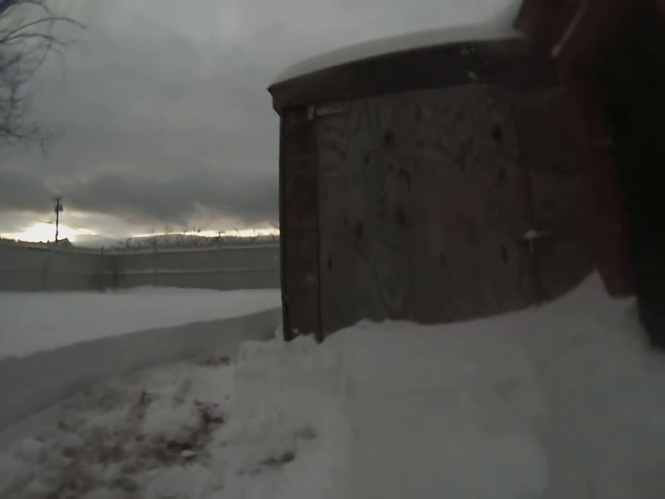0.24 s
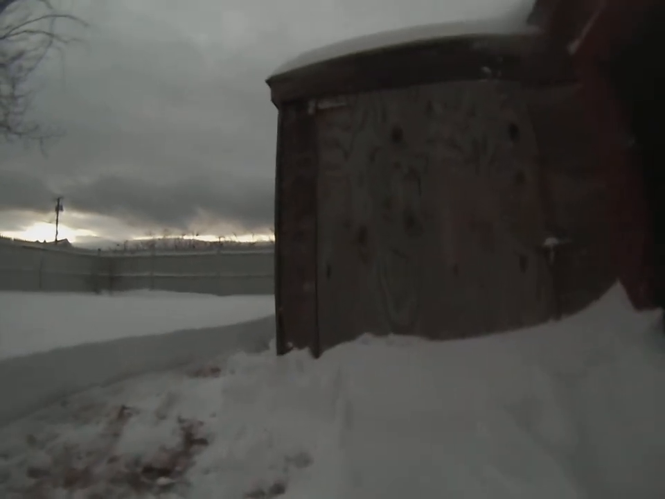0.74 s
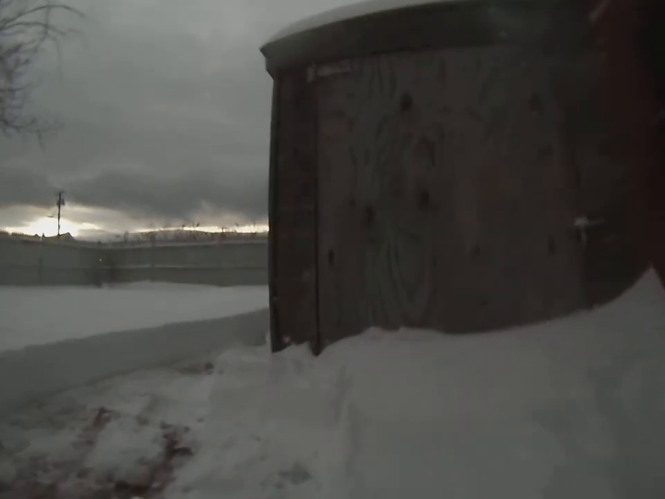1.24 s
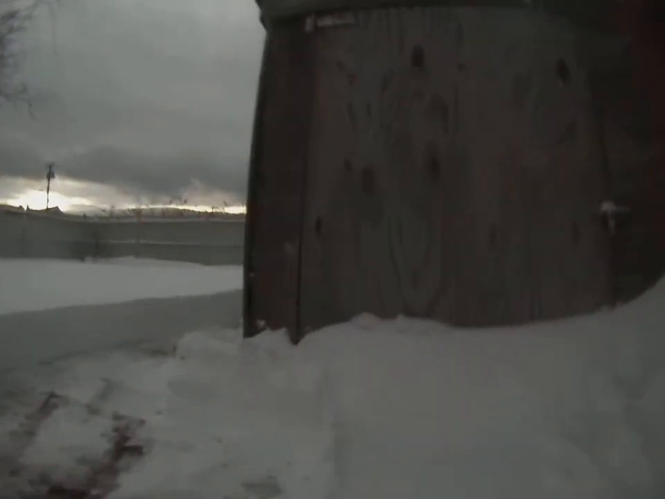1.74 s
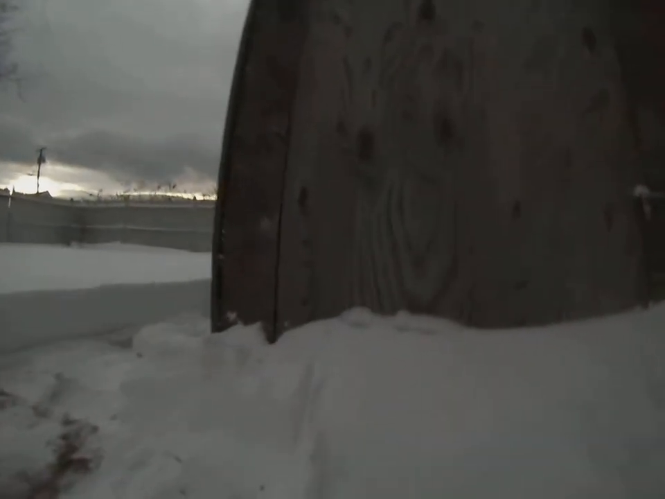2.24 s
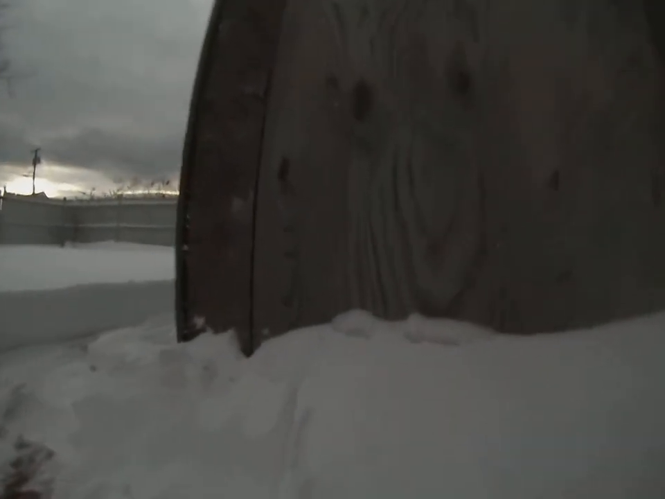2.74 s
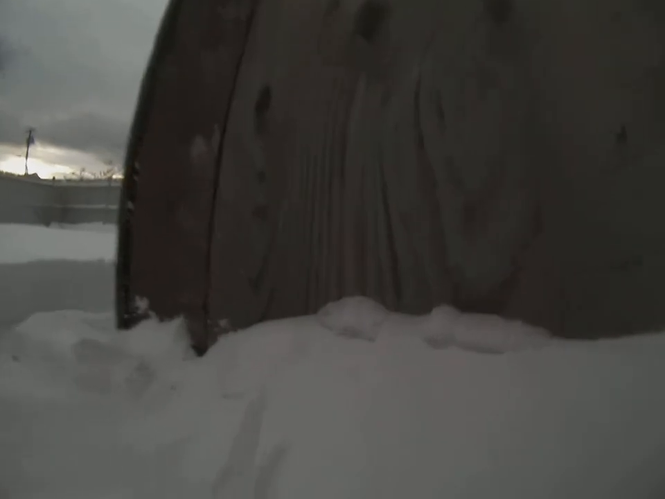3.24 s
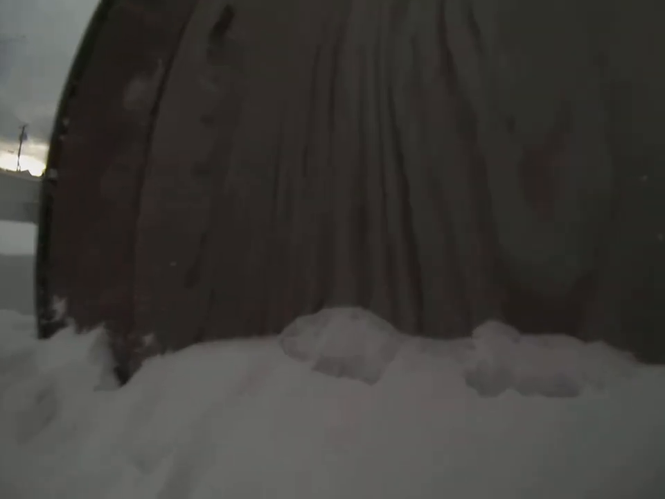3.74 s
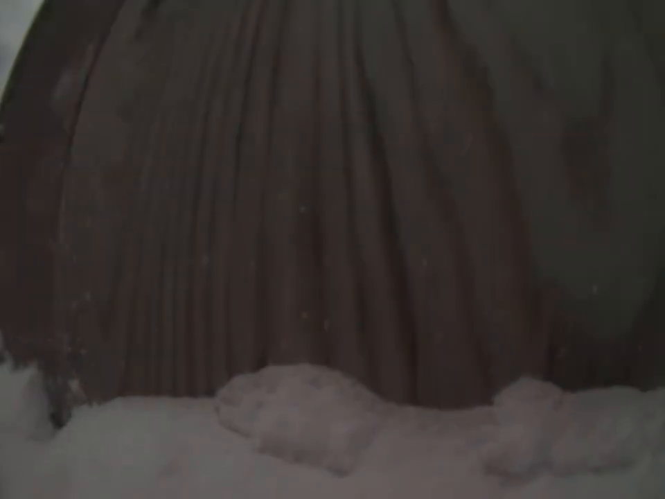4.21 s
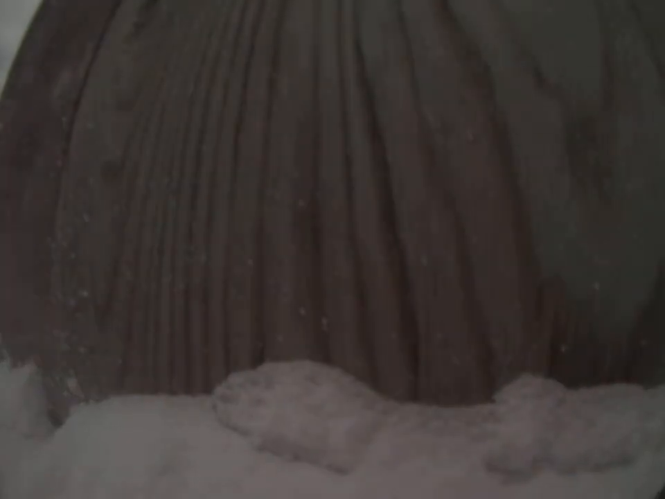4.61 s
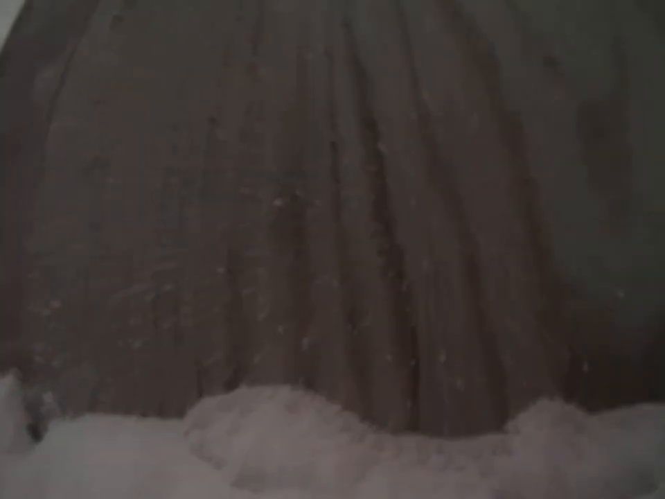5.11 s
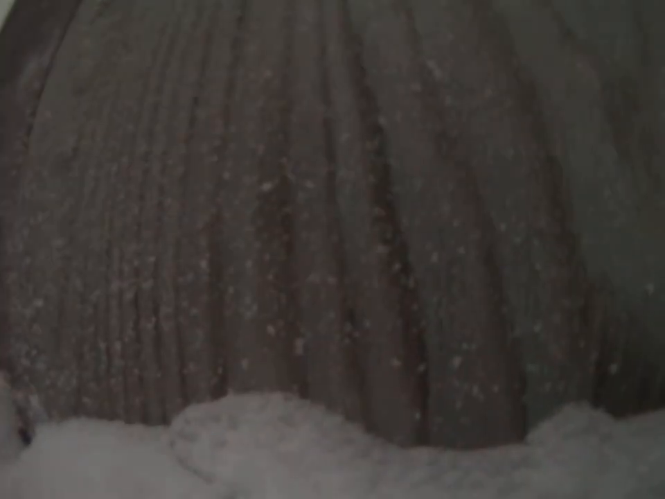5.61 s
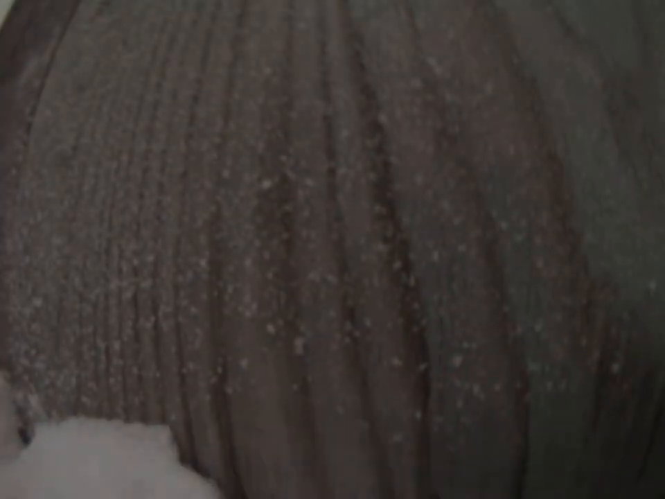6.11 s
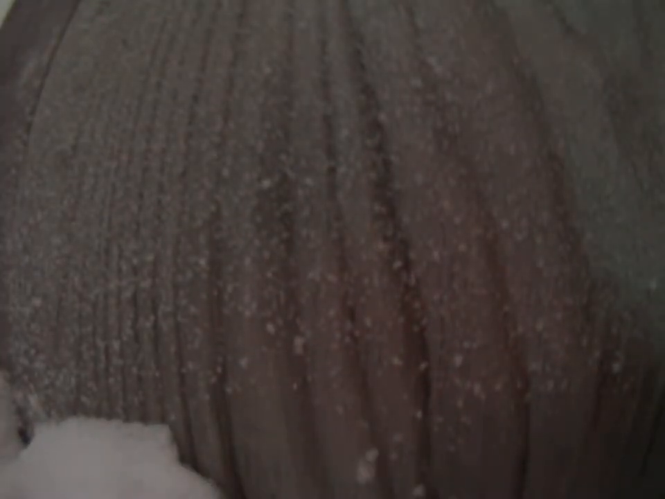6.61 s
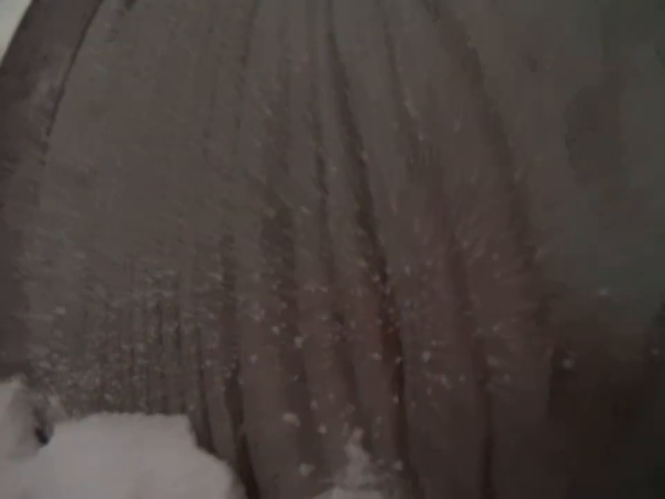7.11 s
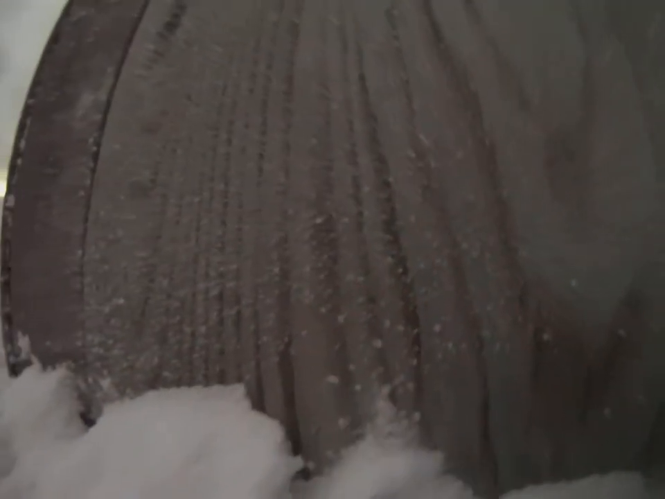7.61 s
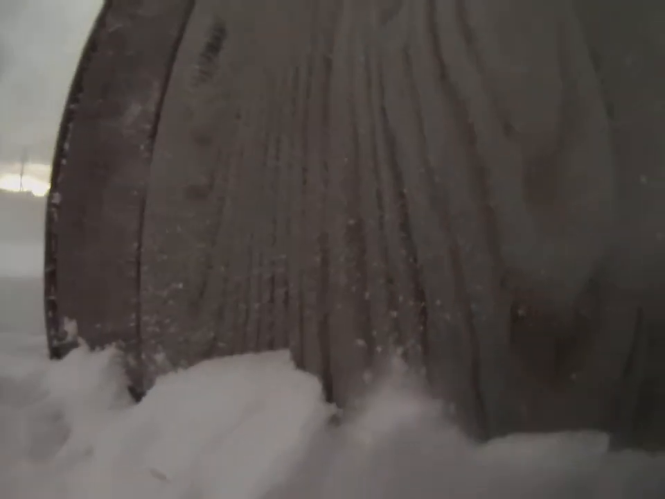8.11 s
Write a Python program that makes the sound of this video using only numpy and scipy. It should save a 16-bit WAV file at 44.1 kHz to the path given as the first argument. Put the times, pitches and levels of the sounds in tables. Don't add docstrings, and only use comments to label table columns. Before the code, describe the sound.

Very close, dry and mono: a one-cylinder engine drones with heavy low vibration, uneven firing and fast clattering panels. Snow and exhaust roar beneath. Cutting deeper, it slows and strains around four seconds, then picks up, eases briefly near five, and runs faster from six with a denser rattle, jolted by hard bites near eight. It never stops.

```python
import sys
import numpy as np
from scipy import signal
from scipy.fft import rfft, irfft, next_fast_len
from scipy.io import wavfile
from scipy.ndimage import uniform_filter1d, map_coordinates

SR = 44100
rng = np.random.default_rng(int(sys.argv[2]) if len(sys.argv) > 2 else 0)


def output_pcm(signal):
    pcm = np.clip(np.atleast_2d(signal).T, -1, 1) * 32767
    wavfile.write(sys.argv[1], SR, np.round(pcm).astype(np.int16))


def volts_from_decibels(level):
    exponent = np.asarray(level, float) / 20
    return 10 ** exponent


N = 368235


def unit(x):
    return x / np.sqrt(np.mean(x ** 2) + 1e-20)


def steady(x, seconds):
    length = int(seconds * SR)
    power = uniform_filter1d(uniform_filter1d(x ** 2, length), length)
    return x / np.sqrt(np.abs(power) + 1e-12)


def curves(rows):
    s, *cols = np.transpose(rows)
    return [np.interp(np.arange(N) / SR, s, c) for c in cols]


def swells(rows):
    t = np.arange(N) / SR
    return sum(db * np.exp(-((t - s) / length) ** 2 / 2) for s, length, db in rows)


def wobble(rate):
    knots = rng.standard_normal(int(N * rate / SR) + 4)
    return map_coordinates(knots, [np.arange(N) * rate / SR])


def per_turn(turns):
    return rng.standard_normal(int(turns[-1]) + 2)[turns.astype(int)]


def filtered(x, response):
    m = 2 * next_fast_len(N // 2 + SR // 4)
    return irfft(rfft(x, m) * response(np.fft.rfftfreq(m, 1 / SR)), m)[:N]


def band(x, lo_hz, hi_hz, order):
    return signal.sosfilt(signal.butter(order, [lo_hz, hi_hz], "band", fs=SR, output="sos"), x)


def modes(table):
    def response(f):
        total = 0
        for k, (centre, width, db) in enumerate(table):
            damping = 1j * f * width
            total = total + (-1) ** k * volts_from_decibels(db) * damping / (centre * centre - f * f + damping)
        return total
    return response


def colour(points):
    hz, db = np.transpose(points)
    return lambda f: volts_from_decibels(np.interp(np.log(f + 1), np.log(hz), db))


def causal(gain):
    def response(f):
        cepstrum = irfft(np.log(gain(f) + 1e-6))
        half = len(cepstrum) // 2
        fold = np.r_[1, np.full(half - 1, 2), 1, np.zeros(half - 1)]
        return np.exp(rfft(cepstrum * fold))
    return response


# (time [s], shaft speed [Hz], shaking at shaft speed [dB])
SHAFT = [(0.0, 65.16, -12.6), (0.76, 63.93, -15.3), (1.25, 63.86, -14.4), (1.41, 63.98, -15.3),
         (2.5, 63.18, -16.5), (2.67, 62.73, -18.6), (3.1, 62.43, -15.8), (3.98, 60.46, -15.9),
         (4.14, 59.32, -16.4), (4.63, 61.55, -16.0), (5.06, 63.31, -13.8), (5.46, 62.64, -13.8),
         (6.16, 66.57, -14.6), (6.45, 66.54, -13.6), (7.09, 67.23, -14.7), (7.25, 66.85, -13.4),
         (7.8, 66.85, -12.6), (8.35, 67.81, -13.1)]
# (time [s], slip of the second order [turns], nearness of the wall [0-1])
PUSH = [
    (0, .02, 0),
    (2.9, -.03, 0),
    (4.6, .19, .35),
    (5.1, 0, .45),
    (5.35, .04, .5),
    (6.3, .41, 1),
    (7.0, .41, .95),
    (7.25, .13, .9),
    (8.35, .1, .65),
]


def level(db, shaking=0, sag=0, slip=0, wall=0):
    hz, shake_db = curves(SHAFT)
    slip_turns, near = curves(PUSH)
    return db + shaking * (shake_db + 15) + sag * (63.5 - hz) + slip * slip_turns + wall * near


# (time [s], length [s], level [dB])
BITES = [
    (.1, 0.11, 2.5),
    (2.15, 0.081, 2),
    (3.5, 0.13, 3),
    (4.4, 0.23, 4),
    (5.15, 0.1, -6),
    (5.5, 0.1, -3),
    (7.25, 0.13, -1.5),
    (7.75, 0.21, 0.5),
    (8.03, 0.088, 5),
    (8.3, 0.064, 4),
]


def shudder():
    return swells(BITES)


# (time [s], length [s], dip [dB])
SLACK = [(0.026, 0.0078, -6.3), (0.461, 0.0062, -8), (0.684, 0.0063, -8.5), (0.732, 0.007, -4.5),
         (0.776, 0.0076, -10), (0.871, 0.007, -2.5), (0.995, 0.007, -13), (1.086, 0.007, -5.5),
         (1.231, 0.007, -8.5), (1.498, 0.0077, -6.5), (1.558, 0.0057, -11), (1.717, 0.0035, -8.8),
         (1.777, 0.0076, -7.5), (1.839, 0.007, -10.5), (2.093, 0.0061, -7.5), (2.283, 0.0059, -2.5),
         (2.496, 0.0056, -7.5), (2.658, 0.004, -8.5), (2.886, 0.0058, -7.5), (3.713, 0.0078, -3.5),
         (3.782, 0.0043, -5.5), (3.837, 0.0054, -8), (3.924, 0.0063, -7.5), (4.063, 0.007, -11.5),
         (4.106, 0.0062, -6.5), (4.95, 0.0078, -8), (5.006, 0.0047, -11), (5.268, 0.007, -3),
         (5.809, 0.007, -3.5), (5.866, 0.0052, -6.5), (6.022, 0.007, -7), (6.049, 0.0043, -2.5),
         (6.408, 0.0058, -5.5), (6.803, 0.0034, -3.5), (6.858, 0.0034, -4), (7.072, 0.0078, -7.5),
         (7.222, 0.0051, -4.5), (8.03, 0.0065, -13.5), (8.09, 0.008, -8.5), (8.159, 0.0065, -4.5)]


def slack():
    return swells(SLACK)


# (frequency [Hz], level per Hz [dB])
ROAR = [(15, 2.5), (60, -4), (300, 0), (430, -5.5), (520, -11.5), (620, -2.5), (780, -10), (900, -7.5),
        (1050, -16.5), (1500, -11.5), (3200, -26), (6000, -38.5), (8000, -66)]


def roar(turns, over):
    puff_db = 1.5 * np.cos(2 * np.pi * (turns - .85)) + 1.6 * per_turn(turns) + .8 * wobble(6)
    puff = volts_from_decibels(puff_db) + 1.8 * over
    noise = filtered(puff * rng.standard_normal(N), colour(ROAR))
    return volts_from_decibels(level(-35.5, shaking=.8, sag=.35, slip=-9.5)) * unit(noise)


# (time [s], peak level [dB])
TICKS = [(0.077, -50), (0.2299, -46.5), (0.2924, -53), (0.822, -54.5), (0.852, -53), (1.3528, -55.5),
         (1.4157, -57), (1.4775, -51), (1.5713, -57), (1.6347, -52.5), (1.7923, -54), (1.8238, -55.5),
         (2.011, -51), (2.0592, -55), (2.391, -53), (2.4877, -61), (2.5177, -56), (2.6439, -53),
         (2.7392, -51), (2.7716, -55.5), (2.8674, -55), (3.5758, -56), (3.8711, -56), (3.904, -51.5),
         (4.0357, -50), (4.1365, -58.5), (5.0974, -51), (5.3966, -52), (5.657, -50), (5.8182, -54),
         (5.966, -51), (5.9968, -52), (6.1225, -54), (6.2422, -53), (6.362, -54), (6.4183, -53.5),
         (6.513, -53.5), (6.6328, -56), (6.6623, -54), (6.7226, -54.5)]
# (frequency [Hz], level per Hz [dB])
TICK = [(5000, -30), (6500, -1), (7200, -5), (9000, -8), (12200, -11), (13300, -21), (15500, -30),
        (16500, -70)]


def tick(chatter, over):
    length_s, over_usual_db = .0014, 62
    topped = volts_from_decibels(swells((s + length_s, length_s, db + over_usual_db) for s, db in TICKS)) - 1
    stray = (.3 * topped + .047 * volts_from_decibels(3 * wobble(9.8))) * rng.standard_normal(N)
    bright = filtered(chatter * (.14 + .67 * over) + stray, colour(TICK))
    return volts_from_decibels(-68.5) * steady(bright, .8)


# (time [s], peak level [dB])
HARD = [(0.9428, -18.5), (1.0041, -17), (1.2401, -16.5), (1.4112, -16.5), (1.5678, -16), (1.7255, -27),
        (1.7878, -22), (2.0547, -7.5), (2.1026, -20), (2.1974, -11), (2.2922, -20.5), (2.5143, -12.5),
        (2.6723, -20), (2.8973, -10.5), (3.4916, -13.5), (3.637, -18), (3.8008, -16), (3.85, -14.5),
        (3.9335, -15), (4.0821, -20.5), (4.1829, -15), (4.2497, -17.5), (4.2822, -12), (4.4164, -16),
        (4.53, -11.5), (4.578, -16.5), (4.594, -10.5), (4.6284, -17), (4.6773, -19), (4.9661, -21),
        (5.442, -15), (5.6461, -20), (5.7239, -13), (5.7862, -20), (5.879, -18), (5.91, -14),
        (5.9713, -15.5), (6.0017, -17), (6.0325, -13), (6.0621, -19.5), (6.124, -14), (6.2424, -12.5),
        (6.4228, -19.5), (6.6927, -16), (6.8129, -24), (6.8723, -22), (7.0818, -12.5), (7.1262, -20.5),
        (7.2454, -12), (7.5158, -14.5), (7.5607, -17.5), (7.8146, -20.5), (7.9189, -16.5), (7.965, -15.5),
        (8.0401, -12), (8.098, -26.5), (8.113, -15), (8.1863, -15.5)]


def hard_strokes():
    lag_s, length_s, share, over_usual_db = .0015, .003, .55, 21
    return volts_from_decibels(swells((s + lag_s, length_s, share * (db + over_usual_db)) for s, db in HARD))


def contacts(turns, shake, over, hard):
    near = curves(PUSH)[1]
    trough_turn = .657 - .09 * near
    crest_db = -4 - 10 * near
    swing = np.abs(uniform_filter1d(shake ** 2, 600)) / np.mean(shake ** 2)
    swing_db = .3 * 10 * np.log10(swing + .05)
    between = volts_from_decibels(-14.5 + .7 * crest_db + 3.4 * wobble(40))
    low = between + 1.9 * over
    high = .75 * between + .45 * over
    lead = np.zeros(N)
    trough = (trough_turn - .01, .024, 3.1, 0, 0)
    crest = (.915, .022, 2.2, crest_db, -5)
    for turn, spread, tail, db, high_db in [trough, crest]:
        cycle = turns - turn + .5
        off = cycle % 1 - .5 - .012 * per_turn(cycle + 1)
        glance_db = -.8 * np.abs(per_turn(cycle + 1)) ** 1.7 * (hard < 1.05)
        size = volts_from_decibels(db + glance_db + 5.5 + swing_db)
        low_width = spread * np.where(off > 0, tail, 1)
        high_width = spread * np.where(off > 0, tail * .65, 1)
        low = low + size * np.exp(-(off / low_width) ** 2 / 2)
        high = high + volts_from_decibels(high_db) * size * np.exp(-(off / high_width) ** 2 / 2)
        onset = np.diff(np.sign(off), prepend=1) > 1
        lead = lead + size * onset * np.sign(per_turn(cycle + 1))
    return low, high, lead


# (time [s], level [dB])
FIRM = [(0, 1), (.3, -1), (.6, -2.2), (3, -3), (3.6, 0), (4.7, -1.8), (5.1, -4.3), (5.5, 0), (6, -2.5),
        (6.9, -3.5), (7.15, -4), (7.4, -0.4), (8.35, -1)]
# (frequency [Hz], level per Hz [dB])
HOUSING = [(900, -37.5), (1080, -26.5), (1250, -13.5), (1500, -1), (1750, -6.5), (2000, -4.5),
           (2300, -14.5), (3100, -15.5), (3600, -21.5), (3800, -16.5), (4050, -21.5), (4500, -27.5),
           (4950, -20.5), (6500, -38.5), (8000, -71.5)]
# (from [Hz], to [Hz], share of the short bright burst [0-1], change at the wall [dB], buzz between contacts [gain])
PANELS = [(690, 1658, 0.054, 1.2, 0.027), (1760, 2442, .1, 2.2, 0.025), (2548, 3720, 0.15, 1.4, 0.092),
          (3680, 4500, 0.62, 2.2, .04), (4554, 5700, 0.79, 1.8, 0.011), (5900, 11000, .95, .1, .02)]


def rattle(turns, shake, over):
    near, firm_db = curves(PUSH)[1], curves(FIRM)[0]
    hard = hard_strokes()
    low, high, lead = contacts(turns, shake, over, hard)
    hits = (rng.random(N) < .09) * np.tanh(3 * rng.standard_normal(N))
    impacts = .4 * rng.standard_normal(N) + 3.2 * hits
    blows = 0
    for lo_hz, hi_hz, bright, wall_db, buzz in PANELS:
        even = steady(band(impacts, lo_hz, hi_hz, order=2), .0025)
        chatter = np.sqrt((hi_hz - lo_hz) / SR * 2) * even
        burst = buzz + low + bright * (high - low)
        strike = burst * chatter + 5.5 * band(lead, lo_hz, hi_hz, order=2)
        blows = blows + hard * volts_from_decibels(bright * firm_db + wall_db * near) * strike
    ring = steady(filtered(blows, causal(colour(HOUSING))), .22)
    ring_db = level(-34.5, shaking=.62, sag=.5, slip=-2.5, wall=3) + .37 * shudder() + slack()
    return volts_from_decibels(ring_db) * ring + tick(low * impacts, over)


def free_play(shake):
    excess = np.clip(np.abs(shake) - .33, 0, None)
    return np.sign(shake) * np.tanh(excess ** 1.64 / .11)


def knock(turns, push):
    strength = .75 + .45 * np.tanh(per_turn(turns + .17))
    thud = band(push * strength, 170, 450, order=2)
    return volts_from_decibels(level(-36.5, shaking=-1.4, sag=.5, slip=-7.5, wall=2)) * steady(thud, .12)


# (frequency [Hz], width [Hz], level [dB])
FRAME = [(84.94, 8.8, 7), (156.8, 22, -8), (193.8, 39, -16), (297, 200, -25)]


def frame_ring(turns):
    firing = np.diff(np.floor(turns + .1), prepend=0).clip(0, 1)
    kicks = firing * np.tanh(.98 * per_turn(turns + .1))
    ring = band(filtered(kicks, modes(FRAME)), 32, 420, order=2)
    ring_db = level(-23.4, shaking=.5, sag=.5, slip=-12, wall=6) + shudder()
    return volts_from_decibels(ring_db) * steady(ring, .14)


# (multiple of shaft speed, rms level [dB], lead [turns], change at the wall [dB], change per Hz of sag [dB])
ORDER = [(.5, -35, 0.22, -0.5, -0.9), (1.5, -27.5, 0.16, 0.5, 1.5), (2.5, -42, -0.2, 4.8, 1),
         (3.5, -44.5, -0.06, -0.5, .1), (4, -46.5, -0.091, -2.8, -0.1), (4.5, -49.5, 0.17, 3.5, -1),
         (5, -43, -.05, -4, -0.7)]


def shaking(turns):
    first_db, slip = curves(SHAFT)[1], curves(PUSH)[0]

    def tone(k, db, lead):
        return np.sqrt(2) * volts_from_decibels(db) * np.cos(2 * np.pi * (k * turns + lead))

    x = tone(1, first_db + .76 * wobble(16), .039 * wobble(11))
    second_db = level(-18.5, sag=1, slip=-6.5, wall=-.7)
    x += tone(2, second_db + .63 * wobble(14), slip + .017 * wobble(16))
    third_db = level(-41, shaking=1.3, sag=.83, slip=9.5, wall=3.5)
    x += tone(3, third_db + 2.8 * wobble(12), -.12 + .11 * wobble(15))
    for k, db, lead, wall_db, sag_db in ORDER:
        order_db = level(db, sag=sag_db, wall=wall_db) + 2.4 * wobble(5.9)
        if k < 2:
            order_db = order_db + shudder()
        follows = 1.11 * slip * min(k - .5, 1)
        x += tone(k, order_db, lead + follows + .072 * wobble(6))
    return x + frame_ring(turns)


def scene():
    turns = .985 + np.cumsum(curves(SHAFT)[0]) / SR
    shake = shaking(turns) * volts_from_decibels(.26 * slack())
    push = free_play(shake)
    over = np.abs(push)
    return (shake + knock(turns, push) + rattle(turns, shake, over) + roar(turns, over))[None]


def roll_off(x):
    return signal.sosfilt(signal.butter(12, 15830, fs=SR, output="sos"), x)


def record(dry):
    soft = dry / (1 + np.abs(dry / 0.91) ** 5) ** (1 / 5)
    dull = filtered(soft[0], lambda hz: 1 / np.sqrt(1 + (hz / 13000) ** 24))
    return roll_off(dull[None])


dry = scene()
out = record(dry)
output_pcm(out)
```